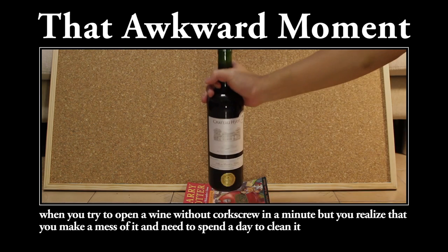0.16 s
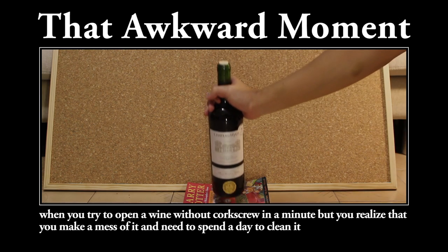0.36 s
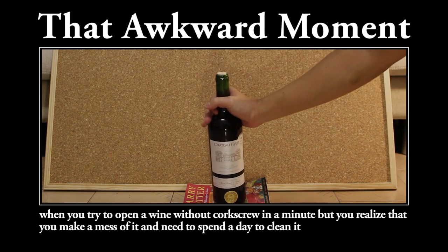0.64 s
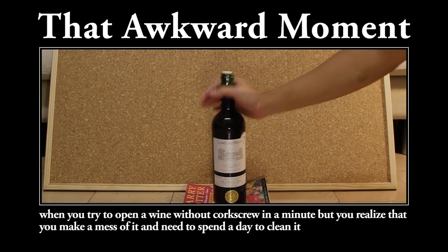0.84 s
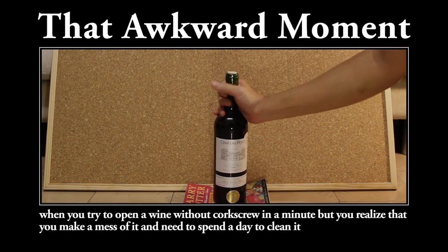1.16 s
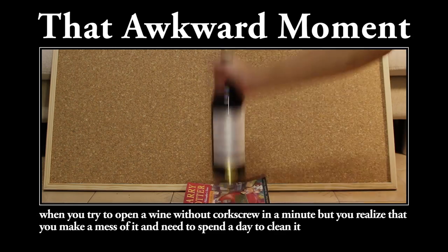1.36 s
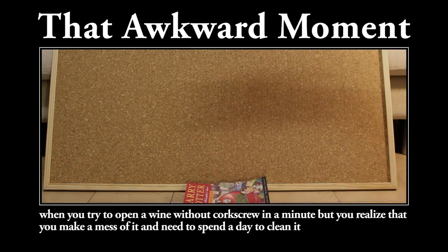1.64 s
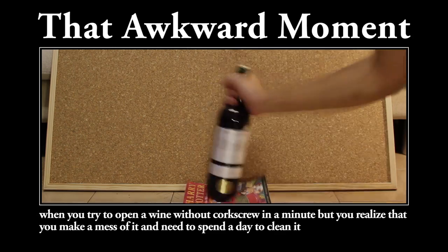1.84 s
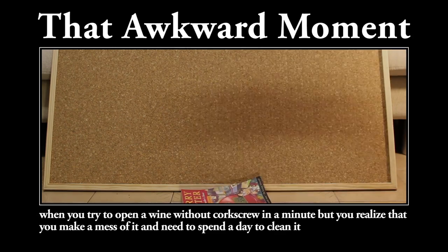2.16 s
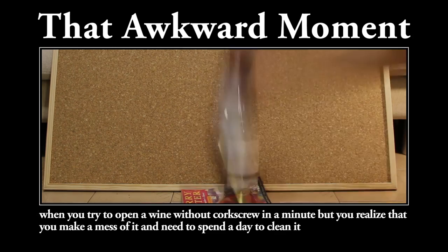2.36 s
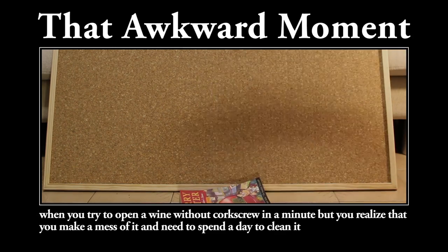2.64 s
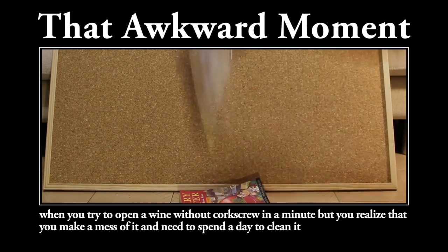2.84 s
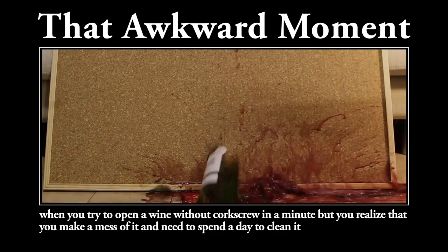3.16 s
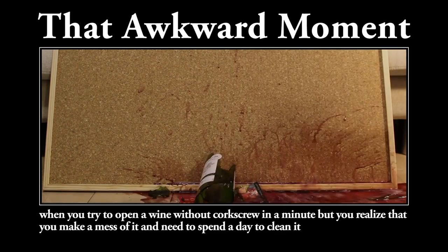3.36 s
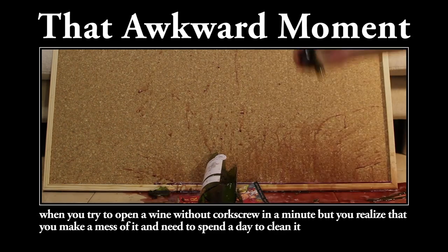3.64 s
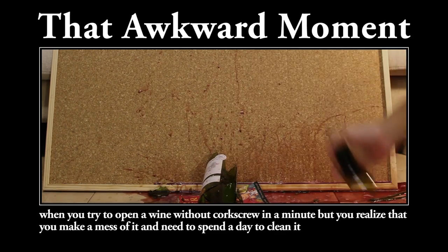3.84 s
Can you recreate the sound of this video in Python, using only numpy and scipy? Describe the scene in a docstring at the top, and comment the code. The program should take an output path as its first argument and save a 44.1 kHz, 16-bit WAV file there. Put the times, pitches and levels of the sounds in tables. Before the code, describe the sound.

A full glass bottle is pounded twice on a padded floor, then smashes into splashing, tinkling shards

```python
"""In a small room with steady noise and a wavering hum, a full wine bottle is handled with small taps.
It is then pounded base first on a book on the floor: two blows make its ringing modes sound, with wine
foaming softly after each. The third bursts it: showers of tiny grains make the wine spray and the grit,
fluttering tones make the spinning shards chink, and short low tones and ticks make the pieces land.
Each blow overloads the close microphone: peaks clip, and the gain ducks and then keeps sinking slowly."""
import sys
import numpy as np
from scipy import signal
from scipy.fft import rfft, irfft, next_fast_len
from scipy.io import wavfile
from scipy.ndimage import map_coordinates

SR = 44100
rng = np.random.default_rng(int(sys.argv[2]) if len(sys.argv) > 2 else 0)


def materialize(psi):
    """Save the field psi as 16-bit PCM at rate SR to the path in sys.argv[1].

    A 1-D psi becomes a single channel; in a 2-D psi each row is a channel.
    """
    bounded = np.clip(np.atleast_2d(psi).T, -1, 1)
    quanta = np.round(bounded * 32767).astype(np.int16)
    wavfile.write(sys.argv[1], SR, quanta)


N = 176400  # samples, 4 s

# Room noise: [f/Hz, relative level/dB]
AIR_COLOUR = [(20, -29), (81, -0.5), (116, -3), (142, -20), (172, -5.5), (234, -6), (262, -13), (301, 2),
              (337, -4.5), (377, -4.5), (1570, -17.5), (3440, -29.5), (8180, -40), (16000, -49.5)]
AIR_DB = -40.5
# Hum of an appliance: [f/Hz, level/dB]
HUM_TONES = [(145.5, -46.5), (242.2, -53)]
# Echo of the room: [f/Hz, time to fall 60 dB/s]
ROOM_T60 = [(100, 0.48), (700, 0.32), (2200, 0.61), (6000, 0.6), (14000, 0.77)]
WET_DB = -7.5  # echo level against the debris itself

# Wine foams inside as the bottle is lifted: [t/s, level/dB]
FOAM_SWELLS = [(2.23, -55.5), (2.76, -52)]
# Resonances of the glass that colour the foam: [f/Hz, half width/Hz, level/dB]
FOAM_RESONANCES = [(2180, 280, -6), (3900, 790, -10), (6100, 700, -10.5), (8900, 650, -20)]
FOAM_S, FOAM_FLUTTER_HZ = 0.12, 63.5

# Loudness of wine drops and crackling chips over time: [t/s, level/dB]
SPLASH_LEVEL = [(3.0, -30), (3.05, -26.5), (3.12, -28.5), (3.18, -25.5), (3.25, -31), (3.33, -29),
                (3.45, -40), (3.58, -63), (3.7, -56), (4.0, -40)]
# Their colour: [f/Hz, relative level/dB]
SPLASH_COLOUR = [(100, -2), (400, 3), (900, -1.5), (1800, 0.5), (3500, -4.5), (6000, -2.5), (15000, -42)]
# Loudness of fine grit and tinkles over time: [t/s, level/dB]
SPRAY_LEVEL = [(3.0, -45), (3.12, -38.5), (3.17, -25.5), (3.25, -29.5), (3.33, -20.5), (3.42, -29),
               (3.5, -20), (3.56, -36), (3.64, -30.5), (3.74, -34), (3.85, -28.5), (4.0, -39)]
# Their colour: [f/Hz, relative level/dB]
SPRAY_COLOUR = [(1000, -6), (3000, -4.5), (5000, -7), (9000, -1.5), (13000, -5), (16000, -10.5)]
DROPS_PER_S, GRIT_PER_S, CRACKS_PER_S, TINKLES_PER_S = 1100, 3500, 170, 220
DROP_RANGE_HZ, GRIT_RANGE_HZ = (300, 7000), (3000, 16000)
CRACK_RANGE_HZ, TINKLE_RANGE_HZ = (700, 5000), (4200, 14000)
# Typical life in cycles: a drop or grit splinter, a crackling chip, a tiny ringing shard
GRAIN_CYCLES, CRACK_CYCLES, TINKLE_CYCLES = 3.5, 22, 310
CRACK_DB, TINKLE_DB, GRAIN_SPREAD_DB = -5, -8, 5
SHOWER_DB, DEBRIS_DB = -1.2, 3.0  # gain of the four showers, then of all debris

# Levels of taps, thuds, ticks, landings and chinks are before DEBRIS_DB.
# Small contacts of hand, bottle and glass pieces:
# [t/s, level/dB, centre f/Hz, width/octaves, time to fall 60 dB/s]
TAPS = [(.640, -41.5, 900, 0.61, 0.25), (.681, -44, 11900, 0.51, .015), (0.906, -47.5, 2980, 0.99, 0.12),
        (1.040, -50.5, 4940, 0.85, 0.11), (1.751, -57.5, 7800, 0.16, 0.55), (1.807, -44, 3070, 0.32, 0.03),
        (3.146, -10, 2160, 0.5, 0.012), (3.408, -20, 1800, 1.7, 0.098), (3.494, -18, 11100, .6, 0.043),
        (3.512, -16.5, 1180, 1.13, 0.16), (3.779, -27.5, 5800, 0.27, 0.34),
        (3.855, -21.5, 13200, 0.24, 0.12), (3.946, -35.5, 1510, 0.46, 0.11)]
# The bottle's body lands: [t/s, level/dB, f/Hz, time to fall 60 dB/s]
THUDS = [(3.2946, -3.5, 248, 0.024), (3.2955, -16, 554, 0.0077), (3.301, -31, 135, 0.17),
         (3.376, -26, 110, 0.048)]
# Splinters hit the board: [t/s, level/dB]
TICKS = [(3.432, -15), (3.457, -17), (3.483, -14), (3.5062, -10), (3.6312, -11), (3.644, -21), (3.691, -28),
         (3.802, -18), (3.857, -17), (3.957, -23)]
# The heavy glass base lands and rocks: [t/s, level/dB]
LANDINGS = [(3.5063, -10), (3.5225, -21)]
# The base rings against the floor: [f/Hz, level/dB, time to fall 60 dB/s]
BASE_MODES = [(415, -14, .09), (800, -6, .07), (1384, -7, .07), (1490, 6, .014), (2019, -7, .06),
              (2595, -13, .035), (3558, -5, .02)]
THUD_RISE_S, TICK_T60_S = 0.00071, 0.007

# Ringing modes of each kind of shard, by name: [f/Hz, relative level/dB]
SHARD_MODES = {"chip": [(15499, 1.5)], "splinter": [(6740, 3), (6795, -4)], "flake": [(9222, 5)],
               "sliver": [(9030, -5.5), (9360, -1), (8800, -10), (9030, -1.5), (11560, -8.5)],
               "plate": [(5475, -2.5), (8032, 1), (9954, -22), (9997, 0.5), (14153, -3)],
               "curved": [(4660, 4), (8150, 2), (12700, 1), (12850, -4)]}
# Chinks of flying shards: [t/s, shard name, level/dB, time to fall 60 dB/s, rise time/s]
CHINKS = [(3.148, "curved", -25.5, 0.6, 0.021), (3.160, "chip", -21, 0.072, 0.00092),
          (3.162, "splinter", -25.5, .35, 0.0063), (3.243, "flake", -30, 0.16, 0.0022),
          (3.251, "chip", -31, 1, .01), (3.267, "splinter", -19.5, 0.56, .008),
          (3.301, "plate", -15.5, 0.097, 0.00073), (3.319, "splinter", -20, 0.32, 0.003),
          (3.322, "plate", -16.5, 0.16, 0.0018), (3.382, "splinter", -15, 0.15, 0.0015),
          (3.426, "splinter", -17, 0.26, 0.0014), (3.431, "chip", -11, .13, 0.00059),
          (3.456, "chip", -21, 0.35, 0.00058), (3.536, "flake", -19.5, 0.31, 0.0014),
          (3.551, "splinter", -15.5, 0.2, 0.021), (3.775, "sliver", -13.5, 0.24, 0.00069)]
SPIN_HZ, SPIN_DEPTH = 38.4, 0.19  # base rate and depth of the tumbling flutter
RATTLE_DB, RATTLE_PER_S = 4, 110  # random loudness swings, knots a second
SHIMMER, SHIMMER_PER_S = 0.83, 185.5  # phase wander in radians, knots a second
DETUNE_RANGE = (-0.000936, 0.0013)  # pitch scatter as a share of the pitch

# The blows: [t/s, push/dB, thump/dB, thump f/Hz, knock/dB, knock f/Hz,
# clatter/dB, room tail/dB, treble lift/dB, boom/dB, bottle ring/dB]
BLOWS = [(1.9325, 6, -1, 320.5, 0, 758, -6.5, -17.5, 2, -19, -29.5),
         (2.4930, 6, 5, 269, 2, 1218, -5, -20.5, 11, -19, -36.5),
         (2.9987, 13, 3, 249, 4, 444.5, -3, -12.5, 14.5, -35, -59)]
# Colour of the push: [f/Hz, relative level/dB]
PUSH_COLOUR = [(30, -28), (120, -16.5), (300, -1.5), (700, -7), (1500, -6.5), (4000, -16), (9000, -29.5),
               (16000, -37.5)]
# Colour of the clatter: [f/Hz, relative level/dB]
CLATTER_COLOUR = [(30, -60), (90, -6.5), (200, -7), (330, 2.5), (520, -0.5), (750, -3), (1800, -4.5),
                  (3500, -12.5), (7000, -32.5), (15000, -41.5)]
# How long the clatter lasts: [f/Hz, time to fall 60 dB/s]
CLATTER_T60 = [(100, 0.53), (350, 0.27), (1500, 0.32), (5000, 0.17), (14000, 0.3)]
# Colour of the room tail: [f/Hz, relative level/dB]
TAIL_COLOUR = [(40, -16), (130, -19), (500, -17), (1000, -4), (2100, 4.5), (4000, -8.5), (7000, -22),
               (15000, -43.5)]
# Where the treble lift acts: [f/Hz, share of the lift]
TREBLE_SHARE = [(2000, 0.031), (5000, 0.84), (9500, 1.4), (14000, 0.5)]
# Floorboards under the book: [f/Hz, level/dB, time to fall 60 dB/s]
BOARD_MODES = [(181, -15, 0.12), (242, -11.5, 0.2), (309.3, -8, 0.18), (396, -11.5, 0.25), (528, -30, 0.24),
               (735, 0, 0.075), (818, -17, 0.13), (1007, -22, 0.51), (1202, -10, 0.14), (1636, -2, 0.071)]
# The whole bottle: [f/Hz, level/dB before the blow's ring level, time to fall 60 dB/s]
BOTTLE_MODES = [(1760, 3, .45), (2019, -2, 1.0), (2089, 4, 1.25), (2304, -3, 1.1), (2379, -2, 1.1),
                (3101, -4, .85)]
# Colour of the rush of air before a blow: [f/Hz, relative level/dB]
SWING_COLOUR = [(120, -10.5), (400, -19.5), (8000, -53)]
SWING_DB, SWING_S = -35, 0.16  # level at the blow, growth time
PUSH_HOLD_S, PUSH_T60_S = 0.0033, 0.031
THUMP_RISE_S, THUMP_T60_S = 0.0016, 0.016
BOOM_HZ, BOOM_T60_S, BOOM_RISE_S = 125.7, 0.63, 0.0047  # the room's low mode
WANDER, WANDER_PER_S = 0.7, 30  # phase wander of the bottle's ring in radians, knots a second
HEAVE_DB = -2  # one-sided shove of air and floor under each blow

CLIP_TOP, DUCK_FROM_DB, DUCK_LAG_S = 0.92, -8.5, 0.038
DUCK_SHARE = 0.17  # dB of gain lost for each dB held
HELD_RISE_DB_PER_S = 2  # the held overload keeps growing
LOW_CUT_HZ, TOP_HZ, EDGE_HZ = 25, 16250, 400


def amp(db):
    """Turn decibels into gain."""
    return 10 ** (np.asarray(db) / 20)


def unit(x):
    """Scale to an rms of 1."""
    return x / np.sqrt(np.mean(x ** 2) + 1e-20)


def along(points, hz):
    """Read a value between (Hz, value) points on a log pitch axis."""
    f, v = np.transpose(points)
    return np.interp(np.log(hz + 1), np.log(f + 1), v)


def clock(size):
    """Sample times in seconds."""
    return np.arange(size) / SR


def fall(t, t60):
    """Die away exponentially, losing 60 dB in t60 seconds."""
    return np.exp(-np.log(1000) * t / np.maximum(t60, 1e-4))


def sine(hz, t):
    """A pure tone starting at zero."""
    return np.sin(2 * np.pi * hz * t)


def wobble(rate, size):
    """A smooth random curve with rate knots a second."""
    return map_coordinates(rng.standard_normal(2048), [clock(size) * rate], mode="wrap")


def filtered(x, gain):
    """Multiply each frequency of x by its own gain."""
    m = next_fast_len(len(x) + SR // 4)
    spectrum = rfft(x, m) * gain(np.fft.rfftfreq(m, 1 / SR))
    return irfft(spectrum, m)[:len(x)]


def noise(colour, size):
    """Noise of rms 1; colour gives dB for each frequency."""
    return unit(filtered(rng.standard_normal(size), lambda hz: amp(colour(hz))))


def dying(x, t60s):
    """Let each frequency of x die at its own speed."""
    hz, t, z = signal.stft(x, SR, nperseg=256)
    faded = z * fall(t, along(t60s, hz)[:, None])
    return signal.istft(faded, SR, nperseg=256)[1][:len(x)]


def ring(modes, wander):
    """One second of dying tones, of slightly random level, whose phases wander by some radians."""
    t, out = clock(SR), np.zeros(SR)
    for hz, db, t60 in modes:
        level = amp(db + rng.normal(0, 1))
        phase = 2 * np.pi * (hz * t + rng.random()) + wander * wobble(WANDER_PER_S, SR)
        out += level * fall(t, t60) * np.sin(phase)
    return out


def add(track, s, x):
    """Mix x into the track at time s."""
    part = track[round(s * SR):][:len(x)]
    part += x[:len(part)]


def background():
    """Hum tones whose phases waver, plus steady coloured noise."""
    hum = np.zeros(N)
    for hz, db in HUM_TONES:
        hum += amp(db) * unit(np.sin(2 * np.pi * hz * clock(N) + 0.5 * wobble(5.6, N)))
    return hum + amp(AIR_DB) * noise(lambda hz: along(AIR_COLOUR, hz), N)


def room(x):
    """The small room's echo: x smeared by noise whose pitches die at their own speeds."""
    tail = dying(rng.standard_normal(SR), ROOM_T60)
    return signal.fftconvolve(x, tail / np.linalg.norm(tail))[:N]


def foam():
    """Churned wine: soft noise flutters through the resonances of the glass."""
    def glass_db(hz):
        power = sum(amp(db) ** 2 / (1 + ((hz - centre) / width) ** 4)
                    for centre, width, db in FOAM_RESONANCES)
        return 10 * np.log10(power)

    t = clock(N)
    fizz = noise(glass_db, N)
    swell = sum(amp(db) * np.exp(-((t - s) / FOAM_S) ** 2) for s, db in FOAM_SWELLS)
    flutter = 1 + np.sin(2 * np.pi * FOAM_FLUTTER_HZ * t + wobble(23.9, N))
    return fizz * swell * flutter


def patter(level, colour, per_s, range_hz, cycles):
    """A shower of tiny drops or splinters at random times, each ringing for some cycles."""
    s, db = np.transpose(level)
    start, length, low = s[0], s[-1] - s[0], range_hz[0]
    count = int(per_s * length)
    t = clock(int(SR * min(cycles / low * 2, 0.1)))
    when, where = rng.random((2, count, 1))
    size, life = rng.standard_normal((2, count, 1))
    hz = low * (range_hz[1] / low) ** where
    t60 = cycles * np.exp(life / 2) / hz
    loudness = amp(GRAIN_SPREAD_DB * np.minimum(size, 2)) * hz
    waves = loudness * sine(hz, t) * fall(t, t60)
    at = ((start + when * length) * SR).astype(int) + np.arange(len(t))
    grains = np.bincount(at.ravel(), waves.ravel(), N)[:N]
    # The difference lifts treble; dividing by frequency tames it again
    shower = filtered(np.diff(grains, prepend=0), lambda f: amp(along(colour, f)) / (f + low))
    even = shower / np.std(shower[int(start * SR):])
    return even * amp(np.interp(clock(N), s, db))


def showers():
    """Splashing wine, crackling chips, fine grit and tinkles, each a crowd of tiny ringing grains."""
    wine = patter(SPLASH_LEVEL, SPLASH_COLOUR, DROPS_PER_S, DROP_RANGE_HZ, GRAIN_CYCLES)
    chips = patter(SPLASH_LEVEL, SPLASH_COLOUR, CRACKS_PER_S, CRACK_RANGE_HZ, CRACK_CYCLES)
    grit = patter(SPRAY_LEVEL, SPRAY_COLOUR, GRIT_PER_S, GRIT_RANGE_HZ, GRAIN_CYCLES)
    tinkles = patter(SPRAY_LEVEL, SPRAY_COLOUR, TINKLES_PER_S, TINKLE_RANGE_HZ, TINKLE_CYCLES)
    return wine + amp(CRACK_DB) * chips + grit + amp(TINKLE_DB) * tinkles


def contacts():
    """Noise bursts for taps and ticks, low tones for the body's thuds, ringing modes for the base."""
    out, t = np.zeros(N), clock(SR // 2)
    for s, db, centre_hz, octaves, t60 in TAPS:
        def hump(hz):
            return -10 * np.log10(1 + (np.log2((hz + 1) / centre_hz) / octaves) ** 4)
        add(out, s, amp(db) * noise(hump, len(t)) * fall(t, t60))
    for s, db, hz, t60 in THUDS:
        rise = 1 - np.exp(-t / THUD_RISE_S)
        add(out, s, amp(db) * sine(hz, t) * fall(t, t60) * rise)
    for s, db in TICKS:
        add(out, s, amp(db) * rng.standard_normal(len(t)) * fall(t, TICK_T60_S))
    for s, db in LANDINGS:
        add(out, s, amp(db) * ring(BASE_MODES, 0))
    return out


def shards():
    """Flying shards ring at their own pitches and flutter as they tumble and rattle."""
    out, t = np.zeros(N), clock(SR)
    for s, shard, db, t60, rise_s in CHINKS:
        for hz, mode_db in SHARD_MODES[shard]:
            spin_hz = SPIN_HZ * rng.uniform(0.84, 1.43)
            spin_phase = 2 * np.pi * (spin_hz * t + rng.random()) + wobble(SPIN_HZ, SR)
            flutter = 1 + SPIN_DEPTH * np.sin(spin_phase)
            rattle = amp(RATTLE_DB * (wobble(RATTLE_PER_S, SR) - 0.5))
            pitch = hz * (1 + rng.uniform(*DETUNE_RANGE))
            phase = 2 * np.pi * (pitch * t + rng.random())
            tone = np.sin(phase + SHIMMER * wobble(SHIMMER_PER_S, SR))
            shape = fall(t, t60) * (1 - np.exp(-t / rise_s))
            add(out, s, amp(db + mode_db) * tone * flutter * rattle * shape)
    return out


def blows():
    """A swing of air, then a push, thump, clatter, boards, ringing bottle, room boom and tail."""
    out, t = np.zeros(N), clock(SR)
    for (s, push_db, thump_db, thump_hz, knock_db, knock_hz,
         clatter_db, tail_db, treble_db, boom_db, bottle_db) in BLOWS:
        def brighter(colour):
            return lambda hz: along(colour, hz) + treble_db * along(TREBLE_SHARE, hz)

        push = noise(lambda hz: along(PUSH_COLOUR, hz), SR)
        push *= fall(np.maximum(t - PUSH_HOLD_S, 0), PUSH_T60_S)
        push /= np.std(push[:SR // 150])  # level set by the first few milliseconds
        body = amp(thump_db) * sine(thump_hz, t) + amp(knock_db) * sine(knock_hz, t)
        thump = body * (t / THUMP_RISE_S) ** 2 * fall(t, THUMP_T60_S)
        clatter = dying(noise(brighter(CLATTER_COLOUR), SR), CLATTER_T60)
        tail = dying(noise(brighter(TAIL_COLOUR), SR), ROOM_T60)
        boom = sine(BOOM_HZ, t) * fall(t, BOOM_T60_S) * (1 - np.exp(-t / BOOM_RISE_S))
        # Two copies of the same ringing modes, each wandering in phase, so the ring wavers
        glass = (ring(BOTTLE_MODES, WANDER) + ring(BOTTLE_MODES, WANDER)) / 2
        heave = amp(HEAVE_DB) * fall(t, PUSH_T60_S)
        blow = amp(push_db) * push + thump + heave
        blow += amp(clatter_db) * clatter + ring(BOARD_MODES, 0) + amp(bottle_db) * glass
        blow += amp(tail_db) * tail + amp(boom_db) * boom
        add(out, s, blow * np.minimum(t / 0.00052, 1) ** 2)  # half a millisecond of fade-in

        rush = noise(lambda hz: along(SWING_COLOUR, hz), SR)
        add(out, s - 1, amp(SWING_DB) * rush * np.exp((t - 1) / SWING_S))
    return out


def scene():
    """Mix the debris with its room echo, the blows, the foam and the background."""
    debris = amp(SHOWER_DB) * showers() + shards() + contacts()
    pounding = blows() + foam()
    debris = amp(DEBRIS_DB) * (debris + amp(WET_DB) * room(debris))
    return (pounding + debris + background())[None]


def record(dry):
    """The microphone's gain ducks at overloads and keeps sinking; peaks clip; both band ends are cut."""
    x, drift = dry[0], HELD_RISE_DB_PER_S * clock(N)
    over_db = np.maximum(20 * np.log10(np.abs(x) + 1e-9) - DUCK_FROM_DB, 0)
    # The worst overload so far is held, and grows with time
    held_db = np.maximum.accumulate(over_db - drift) + drift
    k = 1 / (DUCK_LAG_S * SR)
    lagging_db = signal.lfilter([k], [1, k - 1], held_db)
    clipped = np.clip(x * amp(-DUCK_SHARE * lagging_db), -CLIP_TOP, CLIP_TOP)

    def band(hz):
        top = np.clip((TOP_HZ - hz) / EDGE_HZ, 0, 1)
        return top * 1j * hz / (LOW_CUT_HZ + 1j * hz)

    return filtered(clipped, band)[None]


dry = scene()
out = record(dry)
materialize(out)
```